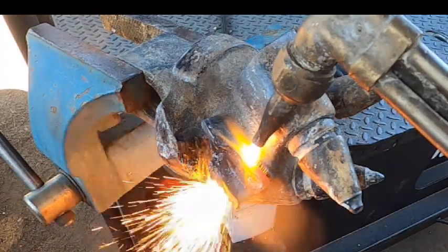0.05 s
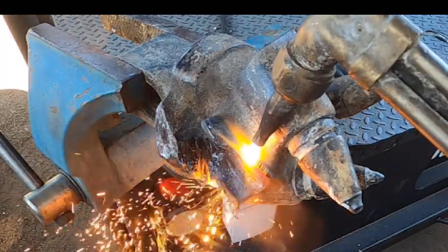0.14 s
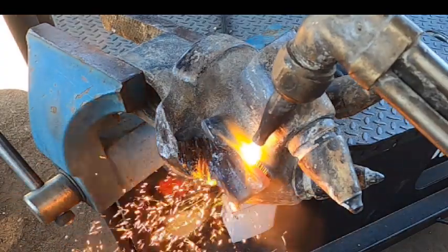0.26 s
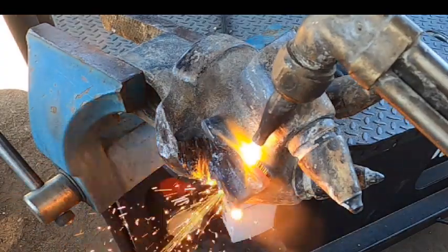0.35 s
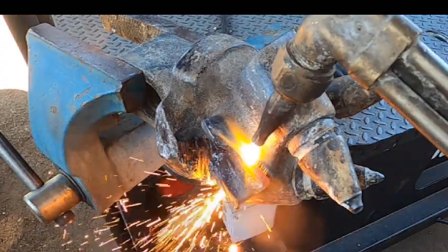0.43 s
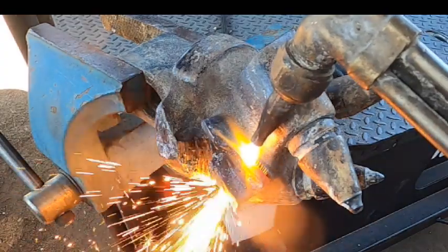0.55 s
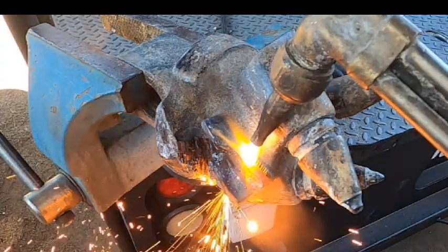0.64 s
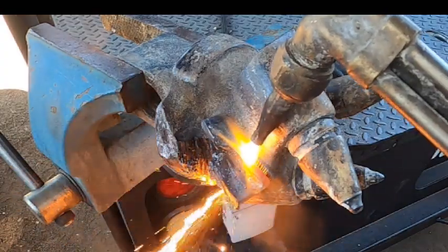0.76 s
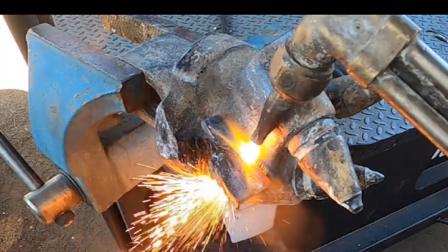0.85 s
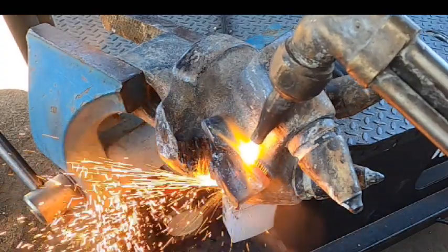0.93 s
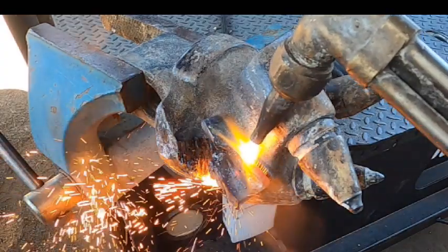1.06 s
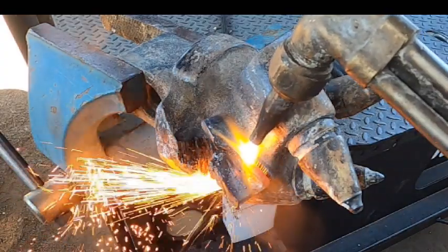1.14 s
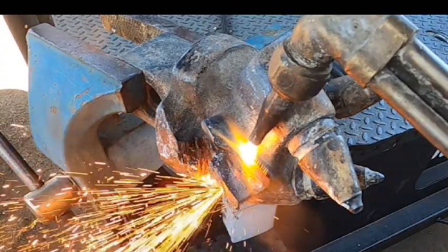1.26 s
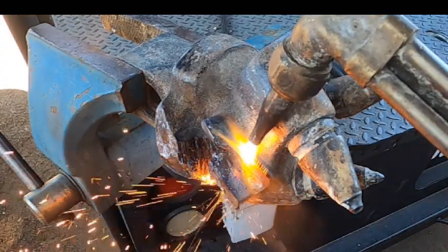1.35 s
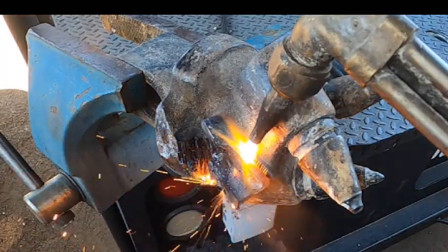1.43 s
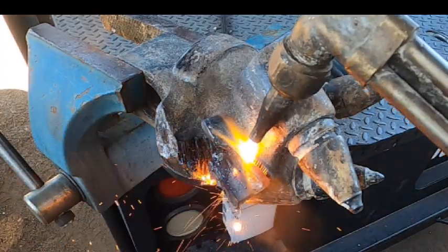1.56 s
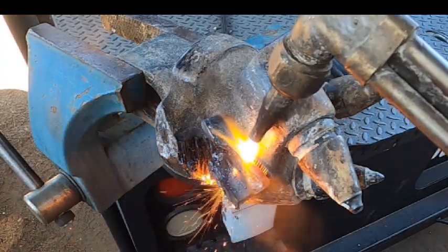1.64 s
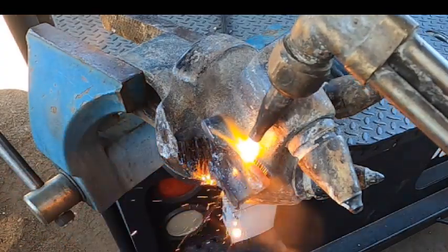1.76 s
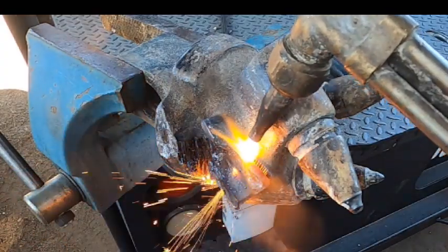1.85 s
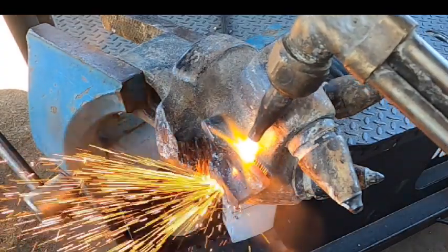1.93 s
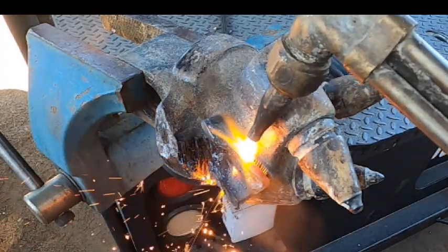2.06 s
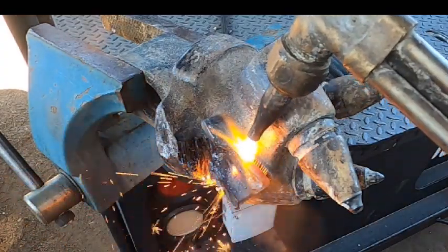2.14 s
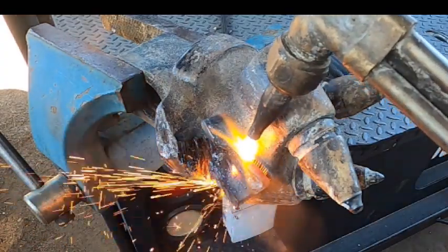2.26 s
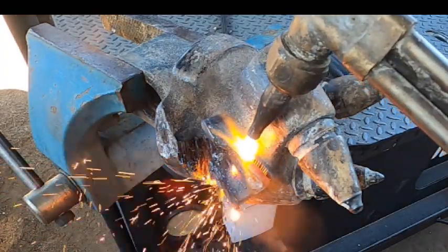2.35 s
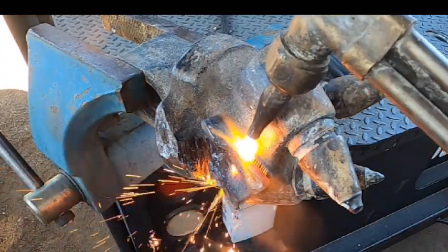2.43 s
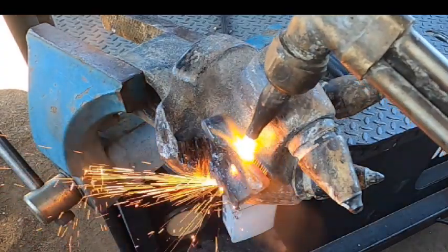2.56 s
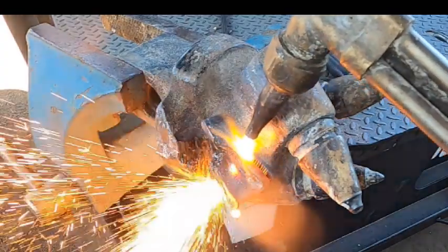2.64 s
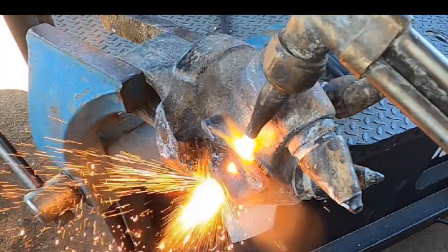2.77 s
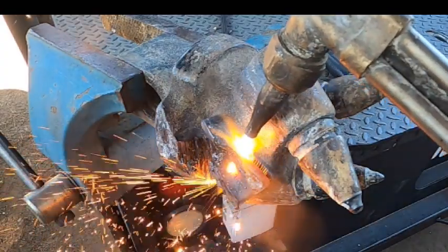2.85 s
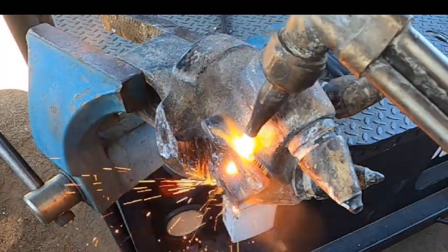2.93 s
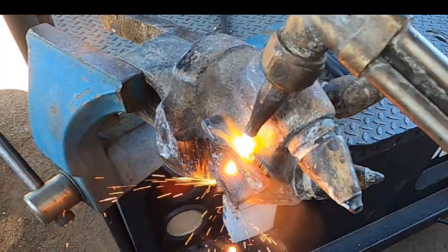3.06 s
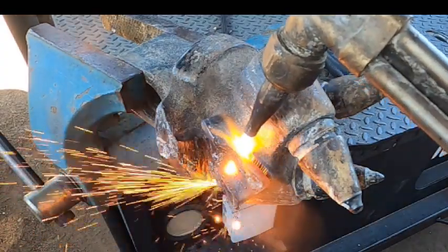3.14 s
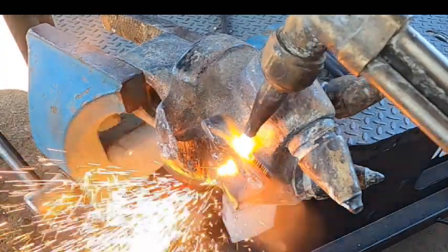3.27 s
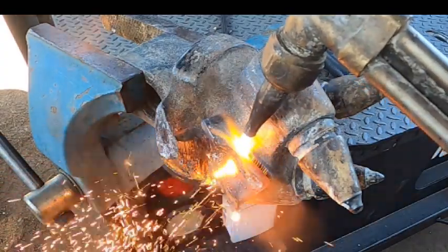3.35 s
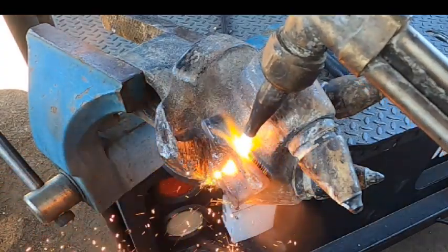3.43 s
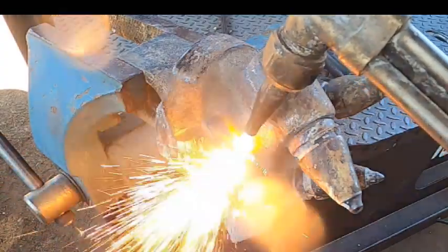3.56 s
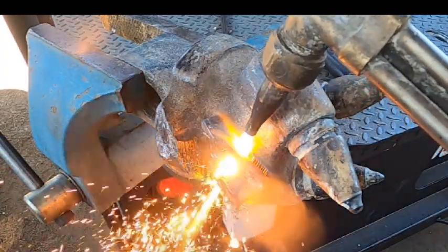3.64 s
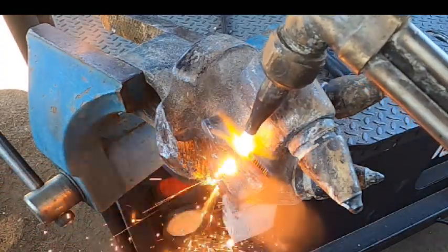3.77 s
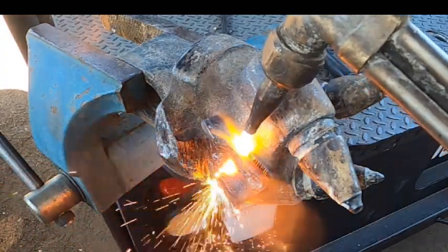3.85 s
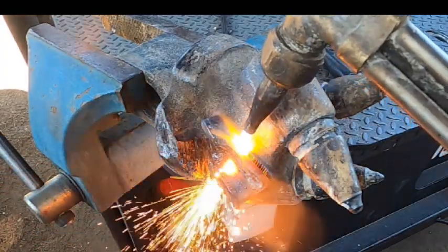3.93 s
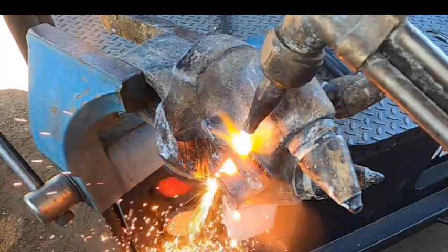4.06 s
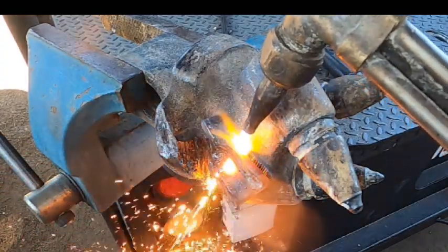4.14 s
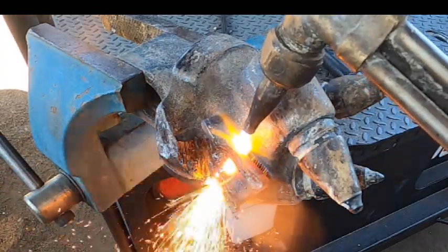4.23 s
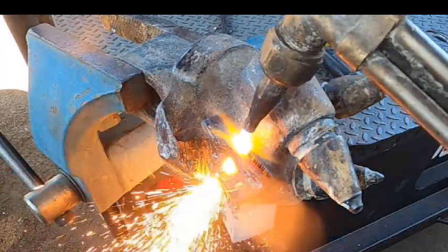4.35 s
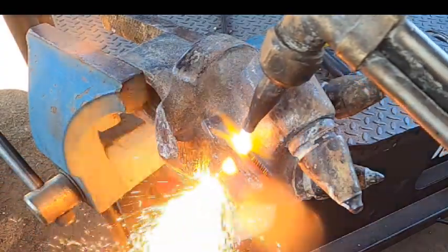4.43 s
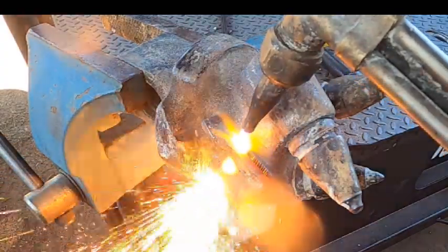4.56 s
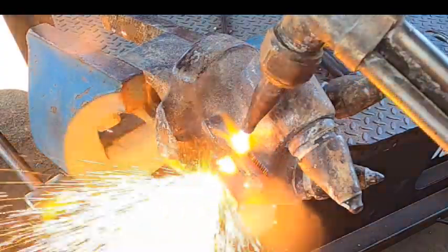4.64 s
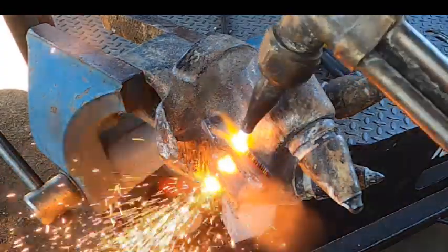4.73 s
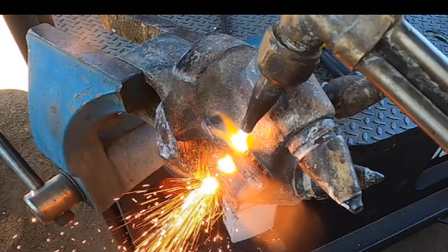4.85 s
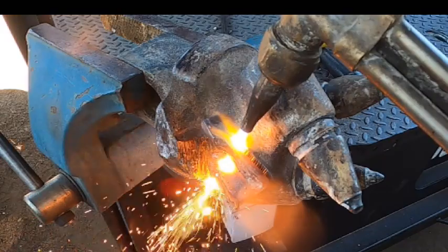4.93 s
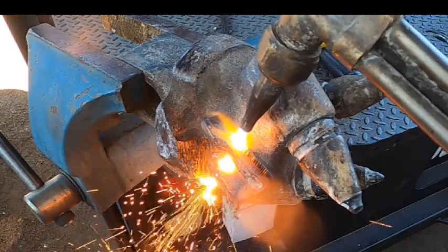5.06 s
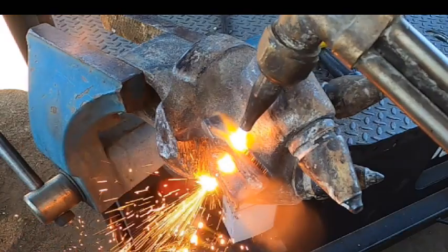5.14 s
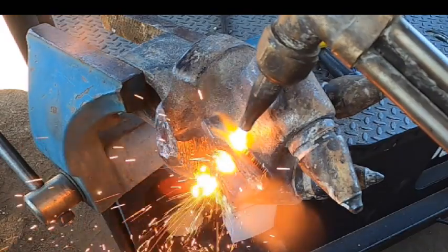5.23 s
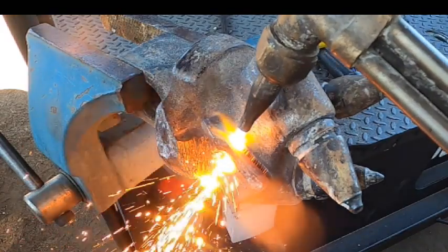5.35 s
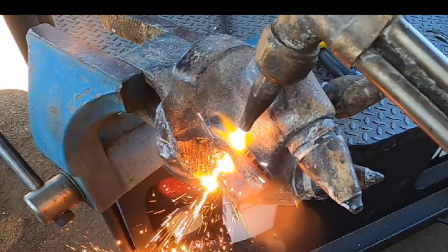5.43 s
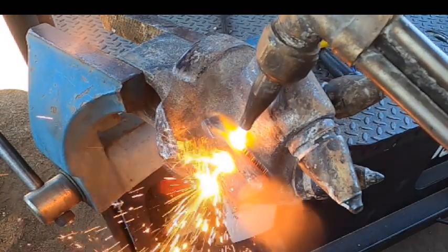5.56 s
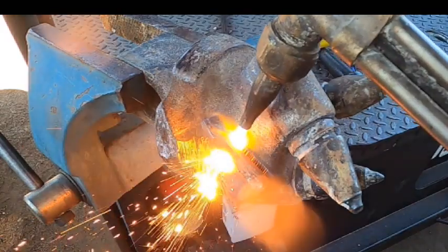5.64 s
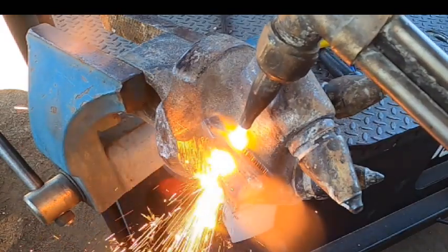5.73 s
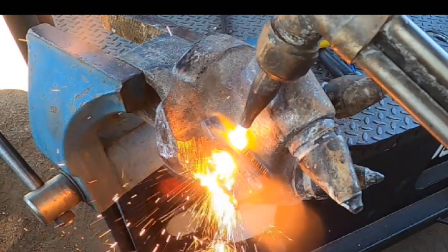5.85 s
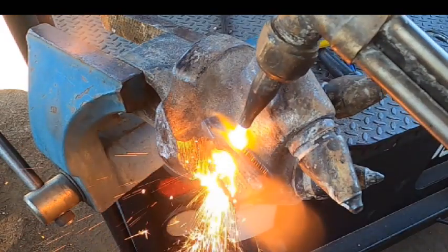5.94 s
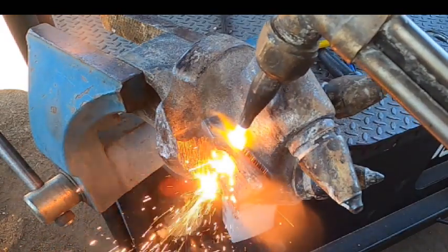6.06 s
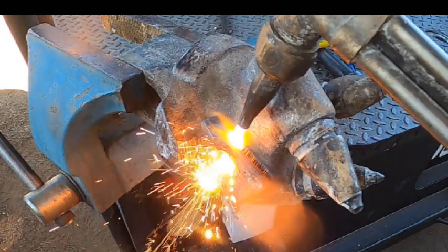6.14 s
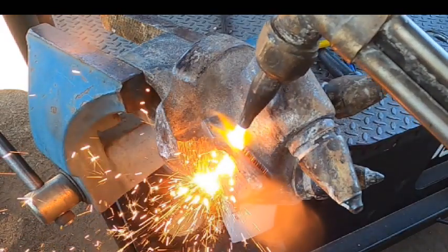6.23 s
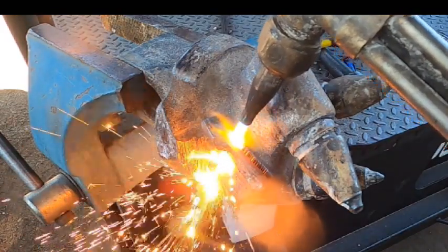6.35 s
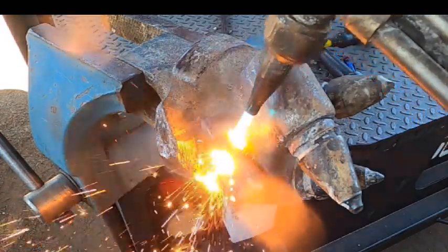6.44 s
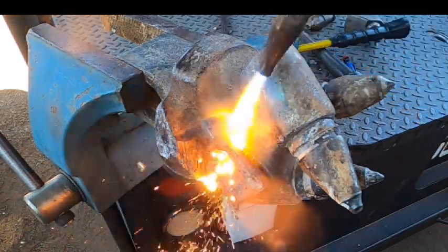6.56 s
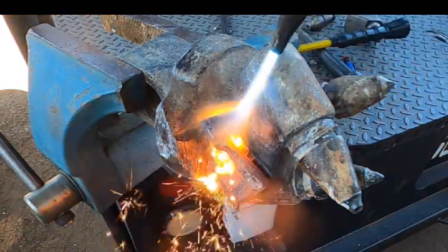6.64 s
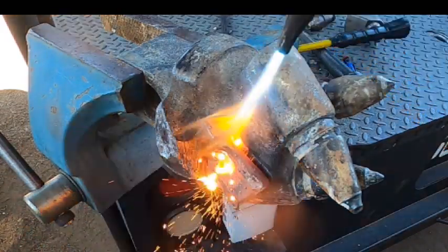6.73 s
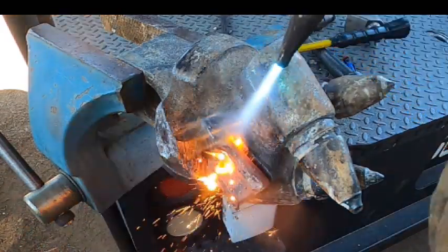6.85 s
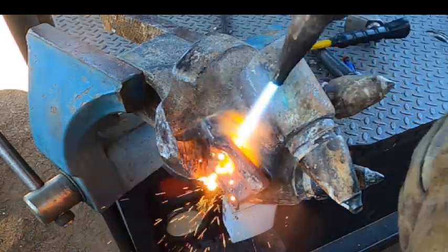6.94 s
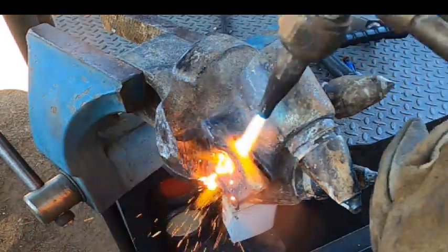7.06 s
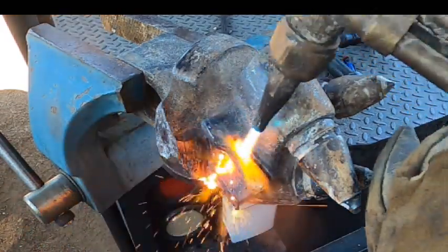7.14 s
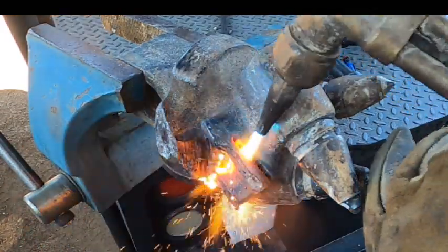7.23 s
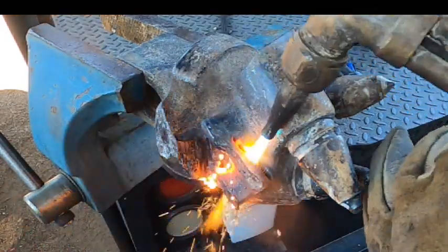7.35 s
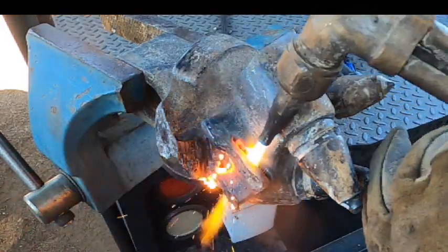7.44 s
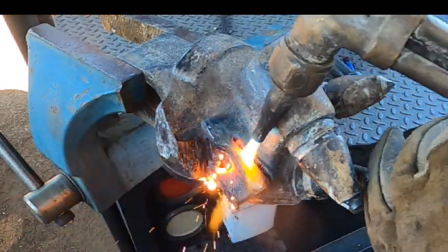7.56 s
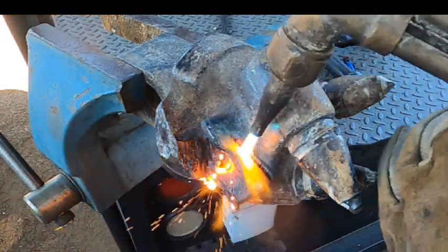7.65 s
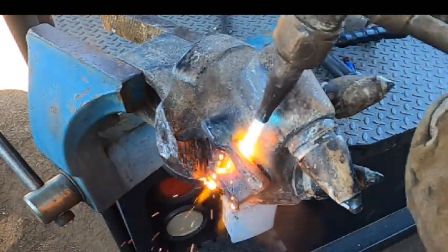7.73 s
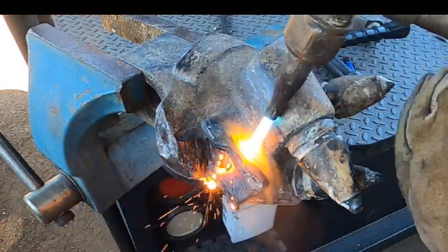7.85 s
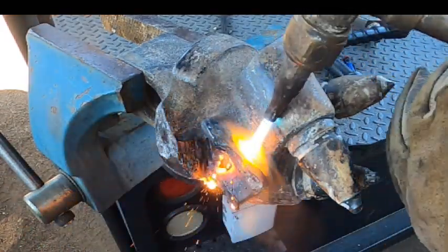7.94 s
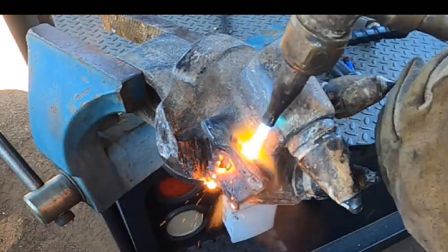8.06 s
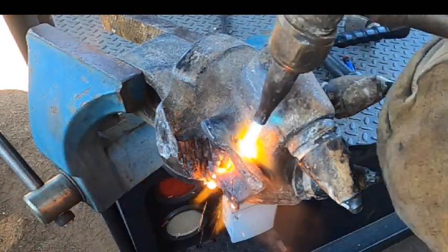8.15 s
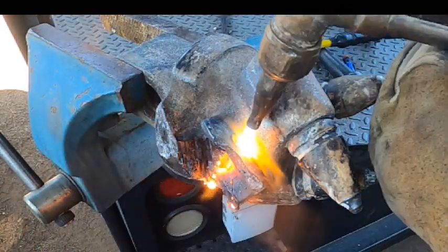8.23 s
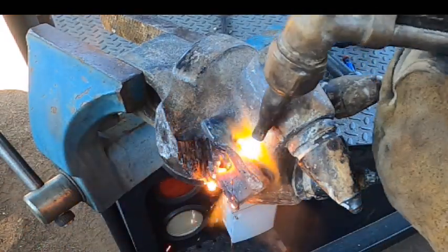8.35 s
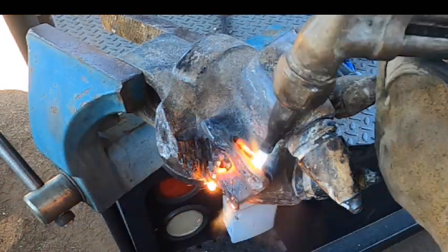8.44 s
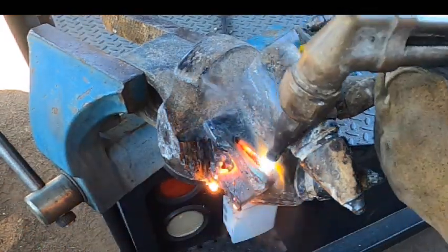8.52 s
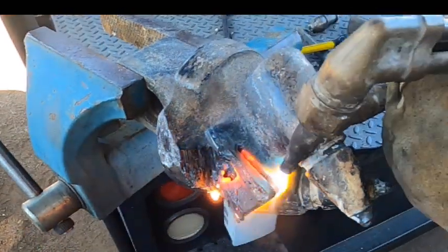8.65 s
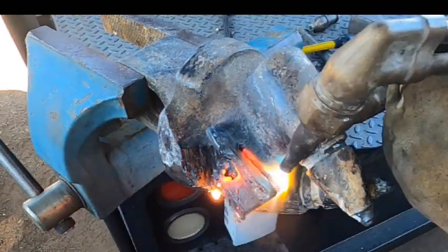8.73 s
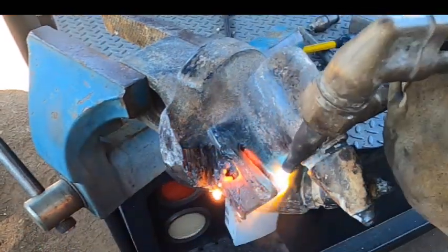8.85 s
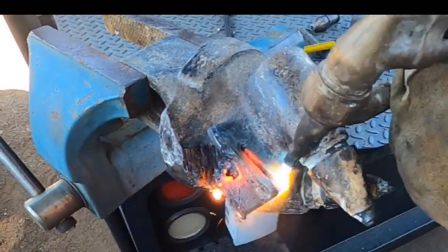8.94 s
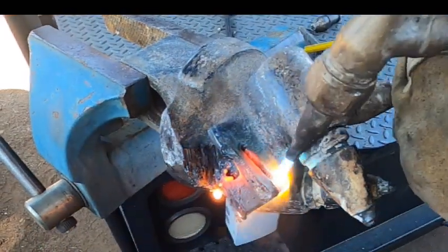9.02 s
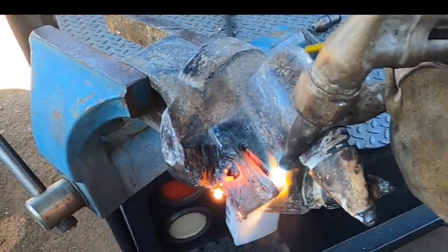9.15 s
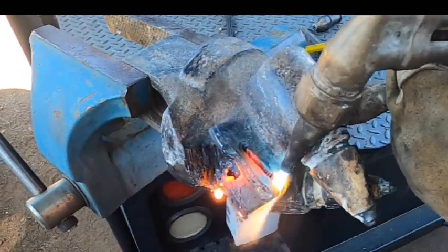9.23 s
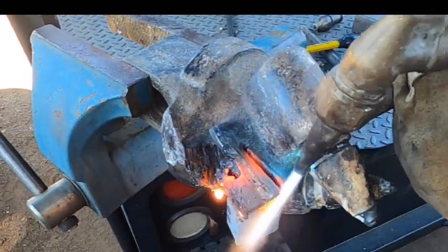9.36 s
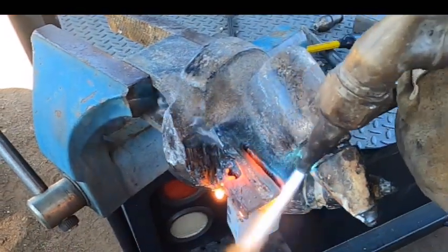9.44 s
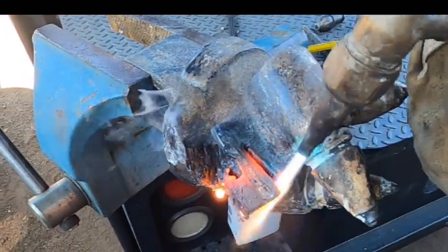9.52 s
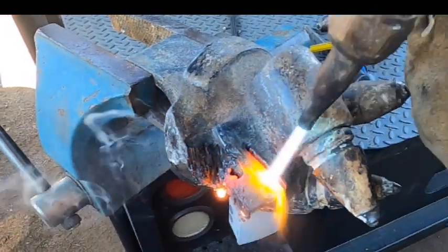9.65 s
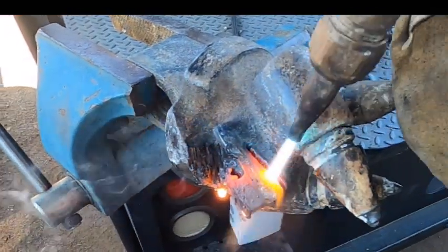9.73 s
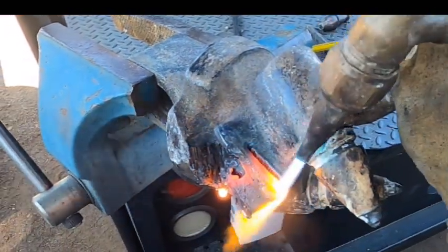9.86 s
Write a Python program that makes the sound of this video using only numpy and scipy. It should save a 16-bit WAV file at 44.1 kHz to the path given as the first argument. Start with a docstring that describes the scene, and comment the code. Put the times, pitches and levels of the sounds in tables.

```python
"""An oxy-fuel torch cuts a steel part held in a vice: its oxygen jet is noise in four layers, a rush in
the slot, a nozzle hiss, a sizzle and a top treble. The flame is lower noise: roar, flutter and rumble.
Slag snaps, pushes and spits in short pops, and a few gliding notes sound for a moment.
Then the lever is released and the bare flame roars as it is swept over the hot steel.
Narrow hollows and a short echo colour the noise of jet and flame."""
import sys
import numpy as np
from scipy import signal
from scipy.fft import rfft, irfft, next_fast_len
from scipy.io import wavfile
from scipy.ndimage import uniform_filter1d

SR = 44100
rng = np.random.default_rng(int(sys.argv[2]) if len(sys.argv) > 2 else 0)


def digitize_waveform(pressure):
    """Quantize a signal to 16-bit integers and store it at the path in sys.argv[1].

    Rows of a 2-D input are taken as channels; values are limited to [-1, 1].
    """
    field = np.atleast_2d(pressure).T
    bounded = np.clip(field, -1, 1)
    quanta = np.round(bounded * 32767).astype(np.int16)
    wavfile.write(sys.argv[1], SR, quanta)


N = 436149


def gain_of(db):
    """Decibels turned into a factor on the size of the wave."""
    return 10 ** (np.asarray(db) / 20)


def evened(x):
    """Scale a signal so that its average power is one."""
    return x / np.sqrt(np.mean(x ** 2) + 1e-20)


def follow(points, t):
    """Value at each time t on the straight lines that join the points."""
    return np.interp(t, *np.transpose(points))


def read(points, hz):
    """Value of a spectrum, straight on a log-frequency axis, all but silent outside."""
    f, value = np.transpose(points)
    return np.interp(np.log(hz + 1e-3), np.log(f), value, -99, -99)


def blend(colour, hz, lever):
    """The colour passes from that of the cut to that of the bare flame as the lever closes."""
    cut = [(f, db) for f, db, _ in colour]
    bare = [(f, db) for f, _, db in colour]
    return read(cut, hz) * lever + read(bare, hz) * (1 - lever)


def bumps(t, events):
    """Sum of smooth bumps given as (middle, length, heights), one row for each height column."""
    middle, length, *heights = np.transpose(events)
    u = np.clip((t[:, None] - middle) / length, -.5, .5)
    return np.array(heights) @ (np.cos(np.pi * u) ** 2).T


def layer(colour_db, level_db, gusty_db):
    """Power over pitch and time of one noise: its colour, its level curve and its own quick gusts."""
    power = gain_of(2 * colour_db)
    gusts = evened(uniform_filter1d(rng.standard_normal(len(level_db)), size=10))
    return power / power.sum(axis=0) * gain_of(2 * (level_db + gusty_db * gusts))


def add(mix, s, sound):
    """Add a short sound to the mix, starting at s seconds."""
    part = mix[round(s * SR):][:len(sound)]
    part += sound[:len(part)]


def surroundings(x):
    """Hollows around the part lift or swallow narrow bands, and an echo off the steel deck combs them; the two
    lowest bands shape the deep rumble of the flame."""
    # hollows, the two lowest rows shaping the flame's rumble: f/Hz, width/Hz, lift/dB
    hollows = [(54, 11, 5.5), (204, 18, -1.5), (330, 30, 3), (510, 40, -1), (977, 25, 2.5), (1802, 46, 6),
               (1847, 87, -5.5), (2192, 34, 7.5), (2246, 55, -4), (2370, 77, 1.5), (2730, 64, -1),
               (2990, 63, 5), (3010, 100, -6.5), (3150, 90, 0.5), (3720, 53, 2.5), (3940, 47, 3),
               (5060, 50, 2.5)]
    # echo, fading as the tip moves behind the part and later returning: t/s, level/dB
    echo_db = [(0, -15.5), (3.4, -13), (4, -28), (9.89, -14)]
    echo_s = .0062  # delay
    length = next_fast_len(N + 4096)
    hz = np.fft.rfftfreq(length, 1 / SR)
    lift_db = sum(db / (1 + (2 * (hz - f) / width) ** 2) for f, width, db in hollows)
    x = irfft(rfft(x, length) * gain_of(lift_db), length)[:, :N]
    echo = gain_of(follow(echo_db, np.arange(N) / SR))
    return x + echo * np.roll(x, round(echo_s * SR), axis=1)


def whistles(waver=0.5, unsteady=11):
    """Brief gliding tones, unsteady in pitch and level: the first two ring with slag spits, the rest are
    sounded by gas in the slot and the buffeting flame."""
    # notes: t/s, length/s, from f/Hz, to f/Hz, level/dB before the fades and the unsteadiness
    notes = [(2.876, 0.018, 2780, 2620, -25), (3.66, 0.019, 2610, 2900, -23), (5.04, 0.15, 1506, 1165, -32),
             (5.607, 0.1, 1404, 1250, -33.5), (8.624, 0.17, 184, 110, -28), (8.685, 0.21, 55.3, 52, -30),
             (8.72, 0.16, 200, 201, -28), (8.847, 0.22, 54, 55, -33.5)]
    out = np.zeros(N)
    # smoothing leaves the chance curves small, about 0.06, so the factors above look large
    chance = uniform_filter1d(rng.standard_normal((len(notes), 2, SR // 2)), size=300)
    for (s, length, from_hz, to_hz, db), (pitch, level) in zip(notes, chance):
        count = round(length * SR)
        hz = np.geomspace(from_hz, to_hz, count) * (1 + waver * pitch[:count])
        shape = np.sqrt(np.hanning(count)) * (1 + unsteady * level[:count])
        tone = np.sqrt(2) * np.sin(2 * np.pi * np.cumsum(hz) / SR)
        add(out, s, gain_of(db) * tone * shape)
    return out


def slag(turns=0.6, snap_hz=1200):
    """Each pop is a sharp inward snap, a quickly damped push of gas and a short spit of mid noise."""
    # pops: t/s, push peak level/dB, push f/Hz, snap peak level/dB, spit level/dB at its height, spit length/s
    pops = [(0.208, -27, 80, -14, -29, 0.015), (0.221, -34, 90, -19, -29, 0.0074),
            (0.709, -35, 200, -24, -20, 0.017), (2.078, -35, 160, -28, -30, .01),
            (2.268, -36, 200, -28, -37, 0.0085), (2.585, -21, 165, -12, -25, 0.0089),
            (2.762, -22, 278, -16, -30, .008), (2.886, -19.5, 151, -25, -36, .008),
            (3.357, -34, 120, -15, -24, 0.021), (3.411, -34, 90, -22, -18, .012),
            (3.665, -31, 140, -22, -28, 0.014), (3.688, -27, 170, -21, -29, .008),
            (3.789, -33, 100, -28, -24.5, 0.012), (4.385, -17, 85, -21, -27, .008),
            (4.405, -28, 75, -36, -34, .01), (4.49, -33, 70, -36, -35, .01),
            (4.558, -24, 110, -28, -29, 0.015), (4.696, -25, 150, -23, -29, 0.023),
            (4.718, -24, 150, -12, -26, 0.055), (4.761, -31, 130, -9.5, -27, .008),
            (5.265, -24, 110, -30, -36, .01), (5.896, -32, 200, -28, -21.5, .01),
            (6.107, -26, 130, -10, -35, 0.013), (6.47, -35, 170, -26, -26, 0.011),
            (6.493, -31, 120, -26, -27, 0.0092), (6.545, -26, 200, -24, -22, 0.018),
            (6.677, -23, 220, -19, -28, 0.02)]
    out, t = np.zeros(N), np.arange(SR // 10) / SR
    band = signal.butter(2, [400, 3000], "band", fs=SR, output="sos")
    noise = rng.standard_normal((len(pops), len(t)))
    snap = -np.sin(2 * np.pi * snap_hz * t) * np.exp(-t * snap_hz / 0.72)
    snap = snap / -snap.min()
    for (s, push_db, hz, snap_db, spit_db, length), grit in zip(pops, noise):
        # the push has died to about a third after 'turns' swings
        push = np.sin(2 * np.pi * hz * t) * np.exp(-t * hz / turns)
        push = push / push.max()
        # the spit is strongest a quarter of the way through its length
        u = t / length * 4
        spit = evened(signal.sosfilt(band, grit)) * u * np.exp(1 - u)
        add(out, s, gain_of(push_db) * push + gain_of(snap_db) * snap + gain_of(spit_db) * spit)
    return out


def flame_power(t, hz, lever, choke):
    """The burning gas roars, with a lower flutter and a deep rumble that follow the roar."""
    # roar, swelling after the lever is shut as the flame sweeps onto the steel: t/s, level/dB before chokes
    flame = [(0, -37), (.65, -32.5), (1.1, -35), (2.6, -34), (3.8, -36.5), (4.45, -40.5), (5.1, -34.5),
             (5.42, -35.5), (5.95, -30.5), (6.45, -32.5), (6.57, -28.5), (6.7, -33), (6.8, -39),
             (7.0, -42.5), (7.09, -29.5), (7.21, -35), (7.45, -27.5), (7.68, -24.5), (7.78, -31.5),
             (8.0, -28), (8.23, -29), (8.34, -32.5), (8.47, -29), (8.55, -25.5), (8.72, -21), (8.9, -23.5),
             (9.2, -24.5), (9.38, -21), (9.6, -19.5), (9.72, -28.5), (9.89, -26.5)]
    # puffs of hot gas: middle t/s, length/s, flutter lift/dB, rumble lift/dB
    buffets = [(.2, 0.54, 4, 8), (2.3, 0.71, -1, 8), (3.0, .4, 1, 9), (3.414, 0.48, 7.5, 17),
               (3.792, 0.63, 7.5, 9), (4.18, 0.46, 9.5, 24), (4.482, 0.61, 14.5, 20), (4.78, 0.39, 6, 11),
               (5.328, 0.52, 8, 16), (5.763, 0.18, 3, 4), (6.48, .2, 4, 1), (6.9, .3, -2, 13),
               (8.0, .6, 3.5, 14), (8.344, 0.26, 3, 13), (8.74, 0.68, 8, 14.5), (9.1, .8, 2, 10),
               (7.12, .2, 2, 1), (7.678, .15, 1, -5), (9.85, .2, 4, -2)]
    # colour of the roar: f/Hz, level/dB per Hz while cutting, level/dB per Hz of the bare flame
    roar_colour = [(120, -30, -27), (250, -11.5, -1), (348, -11.5, 0), (536, -6.5, 3), (750, -2, -0.5),
                   (1030, -1, -0.5), (1320, 2, -3), (1970, -10.5, -7), (2800, -28, -14), (4160, -40, -36)]
    # colour of the flutter: same columns, f/Hz, level/dB per Hz, level/dB per Hz
    flutter_colour = [(60, -20, -20), (100, -10, -15), (140, 0, -7.5), (195, -0.5, 0), (242, 0, -8),
                      (332, -26, -41)]
    # colour of the rumble: same columns, f/Hz, level/dB per Hz, level/dB per Hz
    rumble_colour = [(12, -25, -25), (30, -10, -17), (53, 5, -11), (80, 2, 1), (130, -20, -20)]
    roar = follow(flame, t) + 0.32 * choke  # a choke pushes the roar up
    flutter_lift, rumble_lift = bumps(t, buffets)
    # dB against the roar: while cutting, then for the bare flame
    flutter = roar + flutter_lift - 14.5 * lever - 9.5 * (1 - lever)
    rumble = roar + rumble_lift - 22.5 * lever - 24 * (1 - lever)
    power = layer(blend(roar_colour, hz, lever), roar, 1.2)
    power += layer(blend(flutter_colour, hz, lever), flutter, 1.9)
    power += layer(blend(rumble_colour, hz, lever), rumble, 1.6)
    return power


def jet_power(t, hz, lever, choke):
    """The oxygen jet rushes in the slot, hisses at the nozzle and sizzles; its top treble is kept apart."""
    # slow course before sputters and chokes: t/s, rush level/dB, hiss level/dB, sizzle level/dB
    jet_course = [(0, -24.5, -25, -32), (.5, -22, -27, -28), (1.0, -24.5, -25.5, -26.5),
                  (1.35, -21.5, -25, -28), (2.0, -22, -27, -27), (2.7, -23, -26.5, -28.5),
                  (3.3, -25.5, -25, -25), (3.8, -25, -21.5, -26.5), (4.1, -27.5, -21.5, -27),
                  (4.42, -31, -23, -26.5), (4.7, -24, -26.5, -30), (5.28, -28, -24, -25),
                  (5.9, -23.5, -25, -28.5), (6.08, -25, -25.5, -24.5), (6.3, -22, -26, -28),
                  (6.6, -25.5, -24, -31.5), (6.72, -31, -37, -51), (6.92, -31.5, -32, -44.5),
                  (7.03, -30.5, -37, -47), (7.06, -25, -35, -46), (7.13, -28, -30.5, -42),
                  (7.25, -35.5, -41.5, -51), (7.43, -33.5, -30, -45.5), (7.6, -32, -34.5, -45),
                  (7.78, -33.5, -34, -47), (7.85, -31.5, -30.5, -44), (8.05, -31.5, -32, -39),
                  (8.26, -30.5, -26.5, -44), (8.39, -30, -30, -35.5), (8.55, -29.5, -35, -44),
                  (8.8, -30.5, -31, -37), (8.95, -33.5, -36.5, -41.5), (9.15, -31, -31, -39.5),
                  (9.42, -26.5, -39.5, -44), (9.65, -27.5, -41, -44), (9.76, -28.5, -38, -39.5),
                  (9.89, -29, -36, -48)]
    # the whole jet falters or surges: middle t/s, length/s, level change/dB
    sputters = [(0.188, 0.044, 1), (.25, 0.086, -2.5), (.327, 0.033, 2.5), (0.356, .06, -3),
                (0.604, 0.074, -1.5), (0.756, 0.062, 0.5), (2.6, .06, -2.5), (2.91, .06, 0), (3.68, .06, 1),
                (4.31, .06, 1), (4.76, 0.067, -3), (5.615, .07, -1.5), (5.72, .06, -2), (5.962, .06, -1.5),
                (6.515, .05, -1), (6.574, 0.063, 1.5)]
    # top treble against the sizzle, before chokes: t/s, level/dB
    top_db = [(0, -5), (1.3, -10.5), (2.7, -10), (3.55, -5.5), (3.75, -12), (4.4, -20), (4.8, -23),
              (6.1, -21), (6.55, -13), (7.5, -13.5), (8.8, -13.5), (9.5, -18), (9.75, -11), (9.89, -6)]
    # centre of the nozzle hiss: t/s, f/Hz
    hiss_centre = [(0, 5300), (2.8, 5400), (4.4, 5770), (5.1, 5340), (6.5, 5560), (6.8, 4840), (7.15, 5300),
                   (7.55, 5300), (7.85, 5000), (8.0, 5230), (8.18, 4770), (8.4, 5300), (8.56, 4950),
                   (9.15, 5300), (9.75, 4800), (9.89, 5100)]
    # the rush sounds lower or higher as the tip moves over the steel: t/s, pitch/share of normal
    rush_pitch = [(0, 1.075), (2, 0.99), (4.1, 1.01), (6.2, 0.92), (7.1, 1.01), (7.3, 0.93), (7.75, 0.94),
                  (7.9, 0.98), (8.5, 1.01), (9.89, 1.04)]
    # the sizzle sinks as the cut deepens and later recovers: t/s, pitch/share of normal
    sizzle_pitch = [(0, 1.017), (4.3, 1.005), (5.2, .95), (6.5, 0.98), (6.8, 0.99), (9.89, 1)]
    # colour of the rush at normal pitch: f/Hz, level/dB per Hz while cutting, level/dB per Hz of the bare flame
    rush_colour = [(500, -20, -22), (1030, -39, -5.5), (1690, -3.5, -8), (2040, -5, -4), (2860, 1.5, 2),
                   (3400, -2, -2.5), (4340, -2, -6), (5530, -9.5, -14.5), (7970, -13, -25)]
    # colour of the hiss: f/share of its centre, level/dB per Hz while cutting, level/dB per Hz of the bare flame
    hiss_colour = [(.5, -13.5, -35), (.7, -2, -17), (.85, -1.5, -2), (1, 2, 3.5), (1.15, 2.5, -1),
                   (1.35, -9, -8.5), (1.6, -12, -39)]
    # colour of the sizzle at normal pitch: f/Hz, level/dB per Hz while cutting, level/dB per Hz of the bare flame
    sizzle_colour = [(5900, -8, -25), (7320, -8, -3), (8320, 3, 2), (8960, 5.5, -4.5), (9840, 2.5, -6.5),
                     (10820, -6.5, -16), (12300, -17, -24)]
    # colour of the top treble: f/Hz, level/dB per Hz while cutting, level/dB per Hz of the bare flame
    top_colour = [(9800, -36, -24), (10950, -1, -7), (11500, 1, -5), (12300, 4, 2), (13200, 2, -3),
                  (14500, -4, -5), (15900, -7, -10)]
    times, *levels = np.transpose(jet_course)
    sputter = bumps(t, sputters)[0]
    rush, hiss, sizzle = (np.interp(t, times, level) + sputter for level in levels)
    # a choke dulls the treble and pushes the rush up: share of its depth for each layer
    top = sizzle + follow(top_db, t) - 1.3 * choke
    rush = rush + 0.21 * choke
    hiss = hiss - 0.38 * choke
    sizzle = sizzle - 0.97 * choke
    jet = layer(blend(rush_colour, hz / follow(rush_pitch, t), lever), rush, 0.86)
    jet += layer(blend(hiss_colour, hz / follow(hiss_centre, t), lever), hiss, 0.67)
    jet += layer(blend(sizzle_colour, hz / follow(sizzle_pitch, t), lever), sizzle, 1.2)
    treble = layer(blend(top_colour, hz, lever), top, 1.6)
    return jet, treble


def gas(patchy_db=1.0, shared_db=.5):
    """Turbulent noise of jet and flame, as middle and side: random waves shaped over pitch and time."""
    # how far the cutting oxygen is open: t/s, opening/0-1
    lever_course = [(0, 1), (6.55, 1), (6.75, 0), (9.89, 0)]
    # slag chokes the slot for a moment: middle t/s, length/s, depth/dB (each layer takes a share)
    chokes = [(0.087, .06, 3), (0.202, .06, 4), (.72, 0.14, 3.5), (.93, .1, 0.5), (1.614, .08, 1.5),
              (1.742, .07, 0), (2.144, .1, 0), (3.25, .07, 3), (3.372, 0.084, 5.5), (3.672, 0.13, 8.5),
              (3.93, 0.12, 4.5), (4.305, 0.081, 6), (4.77, 0.14, 4), (5.326, .07, 1), (5.648, 0.21, 5),
              (5.924, 0.23, 4), (6.507, .08, 3)]
    # side against middle below the top treble, before the width below: f/Hz, level/dB
    side_db = [(20, -1), (100, -15), (300, -14.5), (1100, -20.5), (1800, -38.5), (5000, -63), (8000, -16),
               (11000, -44)]
    # change of that side over time: t/s, width/dB
    width = [(0, 0.5), (3.9, -5), (4.3, -16), (8.1, -26), (8.5, -16), (9.89, -46)]
    # side of the top treble against its middle: t/s, level/dB
    lean_db = [(0, -1), (3.9, -3), (4.3, -26), (6, -22), (6.3, -8), (6.7, -2), (9.89, 2)]
    size, hop = 1024, 256  # samples in a frame, and from one frame to the next
    frames, hz = N // hop + 5, np.fft.rfftfreq(size, 1 / SR)[:, None]
    t = np.arange(frames) * hop / SR
    lever = follow(lever_course, t)
    choke = bumps(t, chokes)[0]
    jet, treble = jet_power(t, hz, lever, choke)
    body = jet + flame_power(t, hz, lever, choke)
    a, b, c, d, patches = rng.standard_normal((frames, len(hz), 5)).T
    mid_noise, side_noise = a + 1j * b, c + 1j * d
    # eddies come in patches of time and pitch, and all the gas flickers a little together
    patches = uniform_filter1d(patches, size=9, axis=1)
    patches = evened(uniform_filter1d(patches, size=8, axis=0))
    flicker = evened(uniform_filter1d(rng.standard_normal(frames), size=5))
    texture = gain_of(patchy_db * patches + shared_db * flicker)
    mid = mid_noise * np.sqrt(body + treble) * texture
    # the side of the top treble is partly the middle upside down (louder right), partly its own
    share = .67
    lean = gain_of(follow(lean_db, t)) * np.sqrt(treble)
    wide = gain_of(read(side_db, hz) + follow(width, t))
    own_side = np.sqrt(body) * wide + np.sqrt(1 - share ** 2) * lean
    side = (side_noise * own_side - share * lean * mid_noise) * texture
    # unshaped noise sets the scale, so that the levels in dB hold
    plain = signal.istft(mid_noise, nperseg=size, noverlap=size - hop)[1]
    unit = plain.std() * np.sqrt(1 / len(hz))
    return signal.istft(np.array([mid, side]), nperseg=size, noverlap=size - hop)[1][:, :N] / unit


def scene():
    """Gas noise in its surroundings, with pops and notes in the middle, as left and right."""
    mid, side = surroundings(gas())
    mid = mid + slag() + whistles()
    return np.array([mid + side, mid - side])


def record(dry):
    """A steep filter removes the sound above its edge."""
    edge_hz = 15875
    edge = signal.firwin(1023, edge_hz, window=("kaiser", 7), fs=SR)
    return signal.oaconvolve(dry, edge[None], "same")


dry = scene()
out = record(dry)
digitize_waveform(out)
```